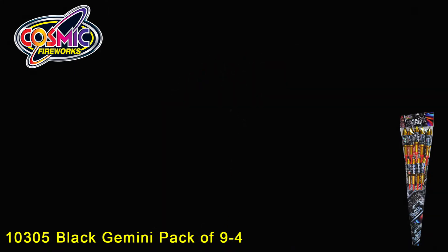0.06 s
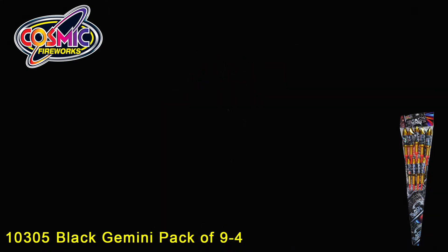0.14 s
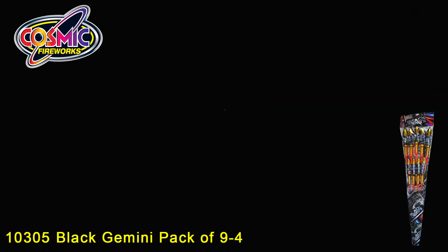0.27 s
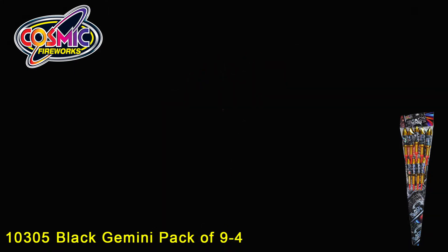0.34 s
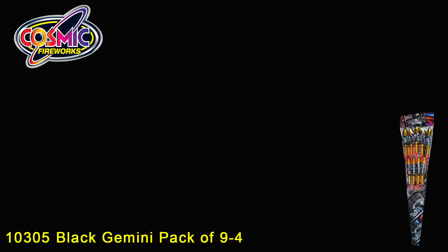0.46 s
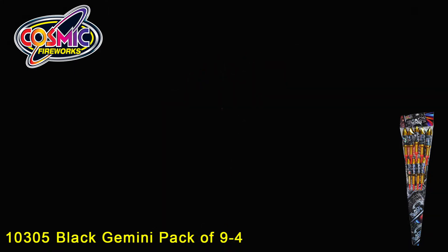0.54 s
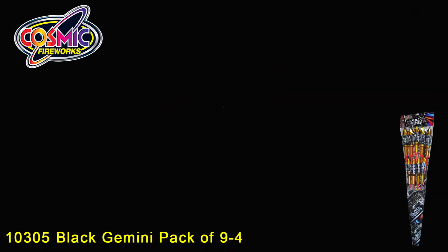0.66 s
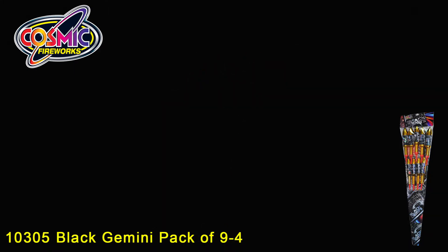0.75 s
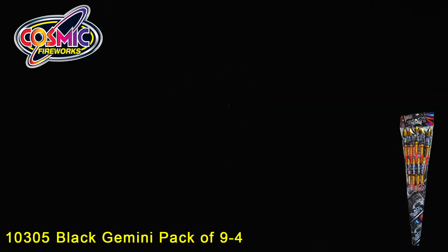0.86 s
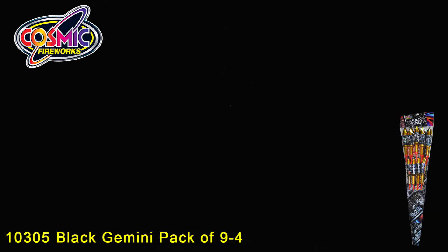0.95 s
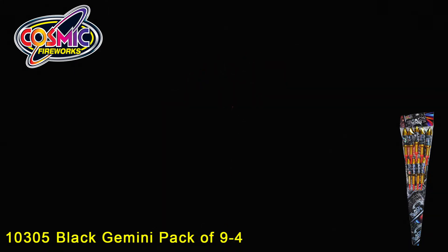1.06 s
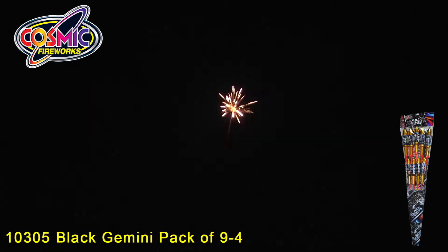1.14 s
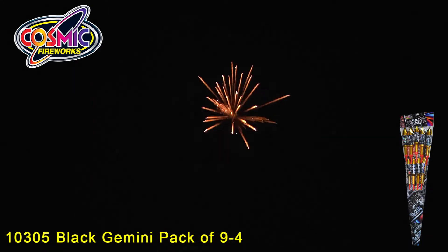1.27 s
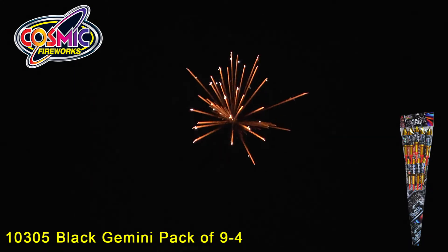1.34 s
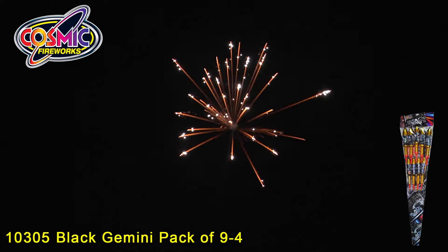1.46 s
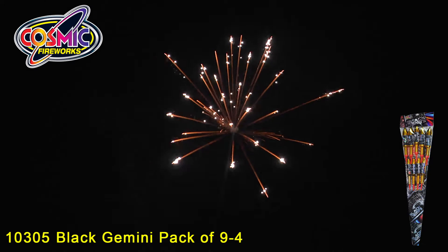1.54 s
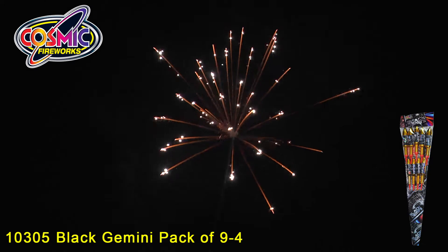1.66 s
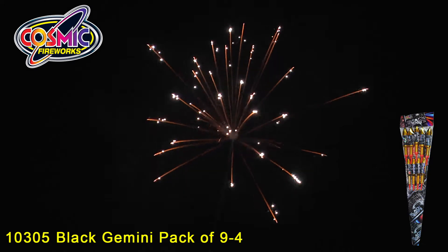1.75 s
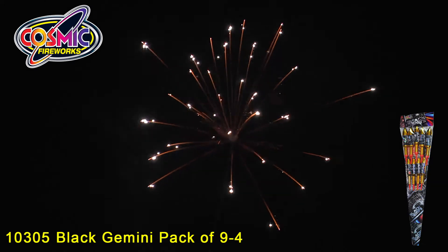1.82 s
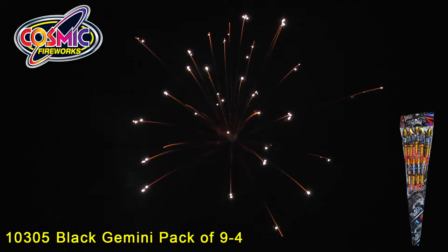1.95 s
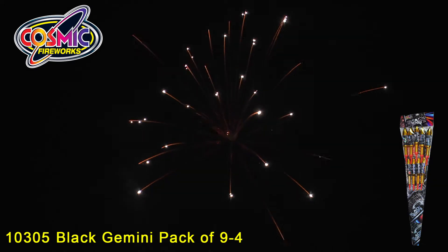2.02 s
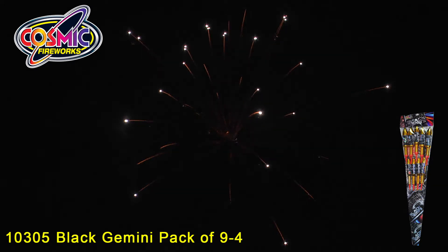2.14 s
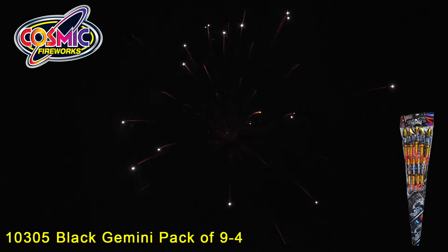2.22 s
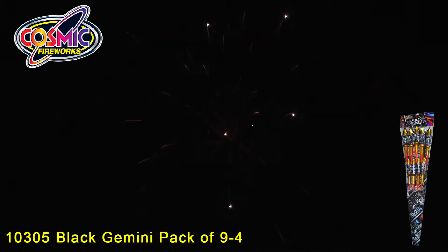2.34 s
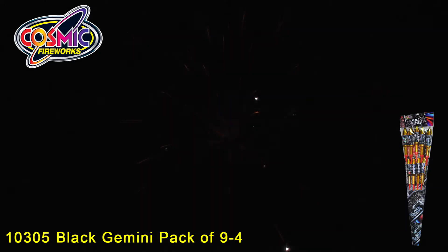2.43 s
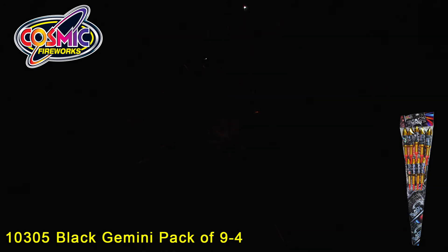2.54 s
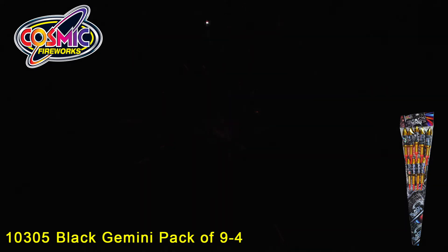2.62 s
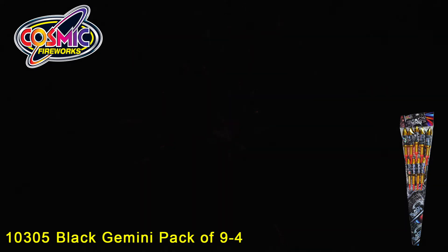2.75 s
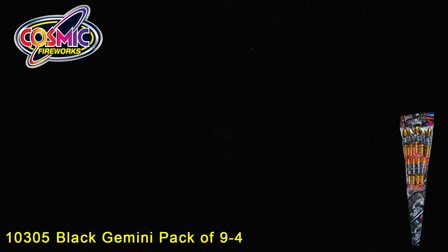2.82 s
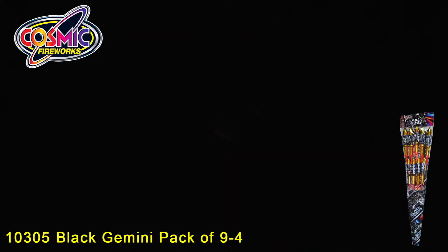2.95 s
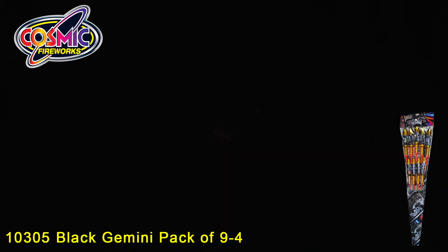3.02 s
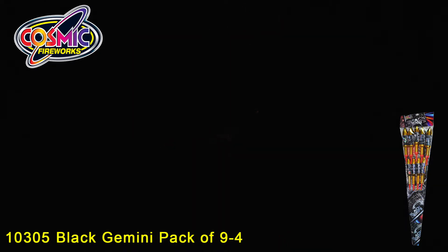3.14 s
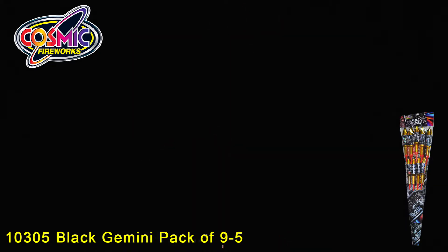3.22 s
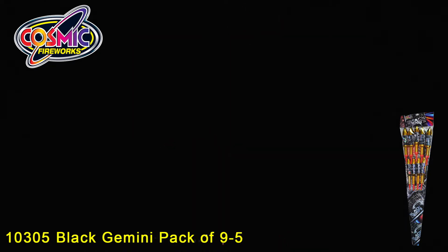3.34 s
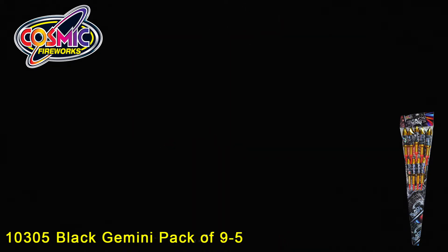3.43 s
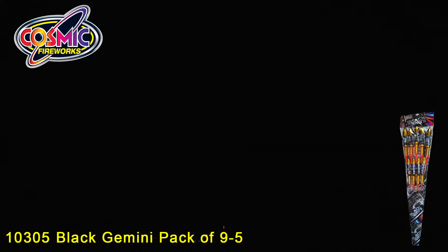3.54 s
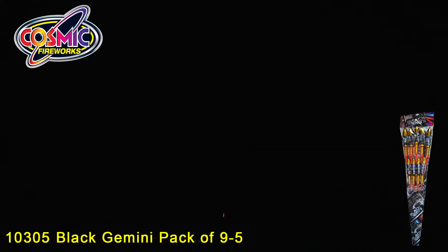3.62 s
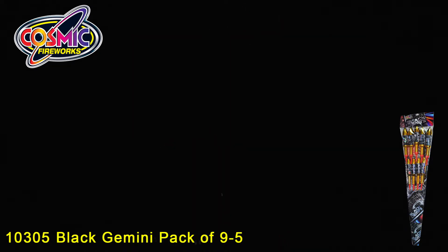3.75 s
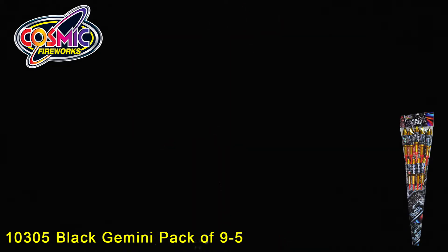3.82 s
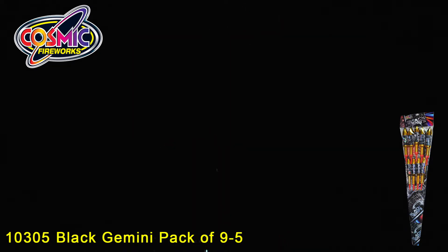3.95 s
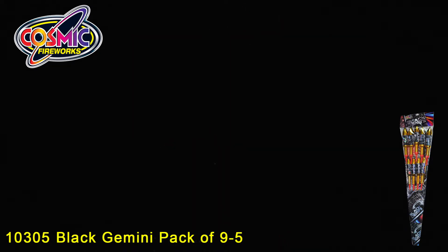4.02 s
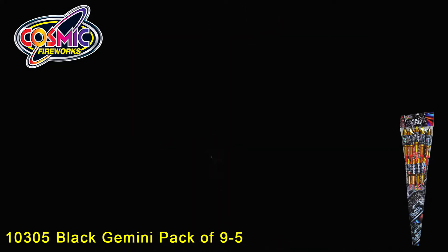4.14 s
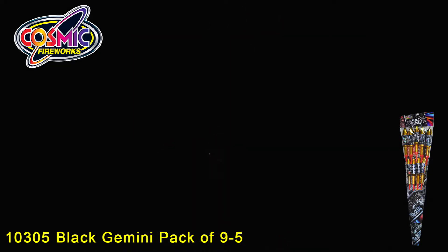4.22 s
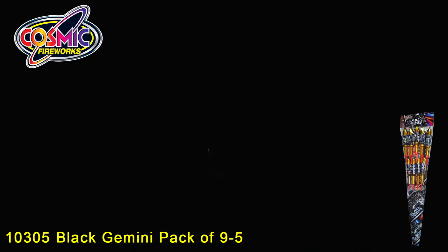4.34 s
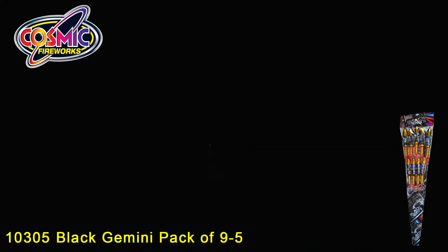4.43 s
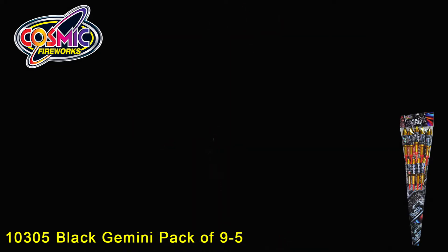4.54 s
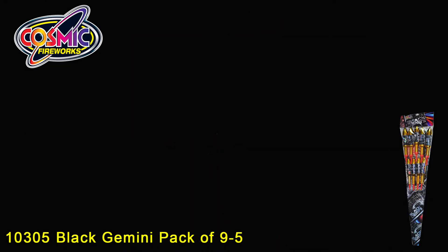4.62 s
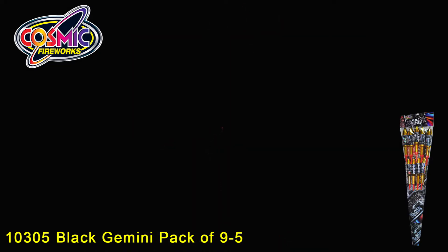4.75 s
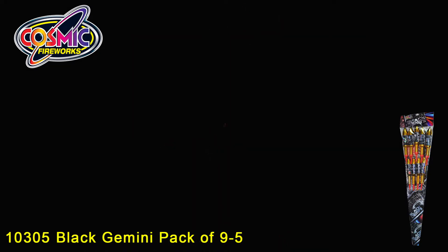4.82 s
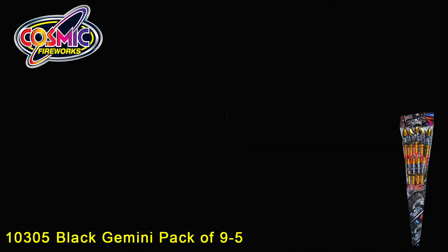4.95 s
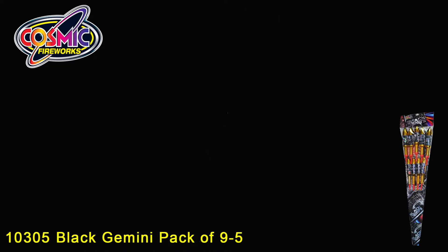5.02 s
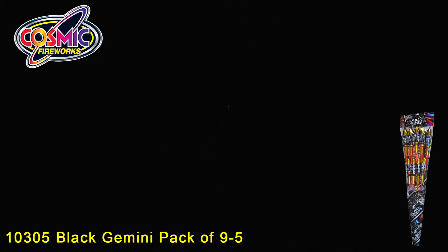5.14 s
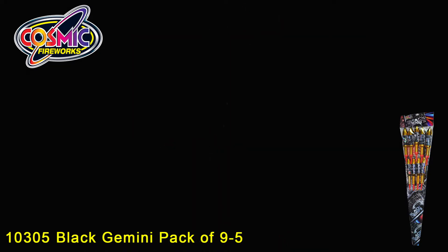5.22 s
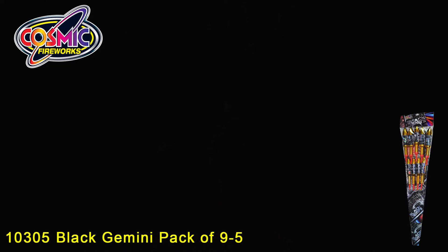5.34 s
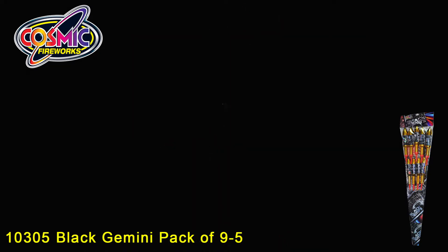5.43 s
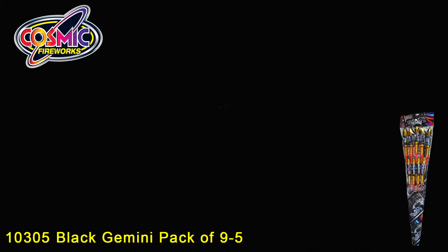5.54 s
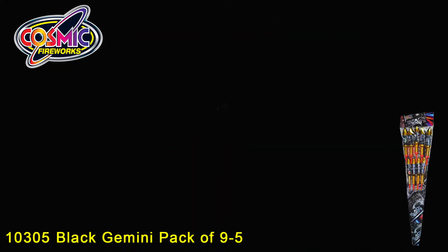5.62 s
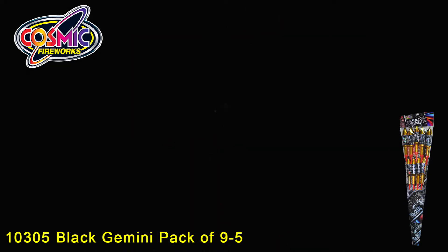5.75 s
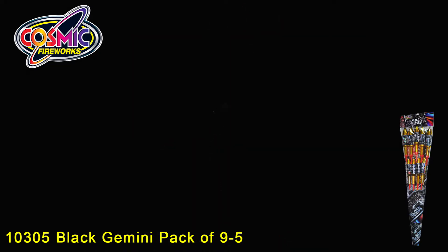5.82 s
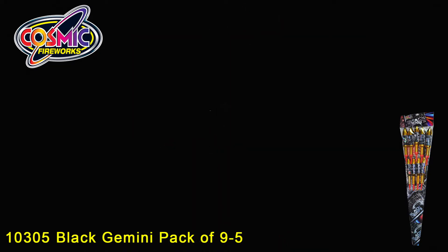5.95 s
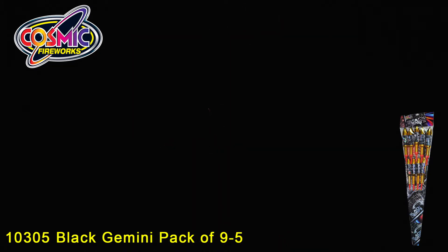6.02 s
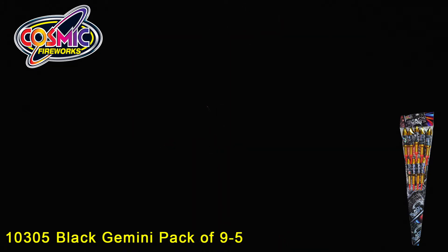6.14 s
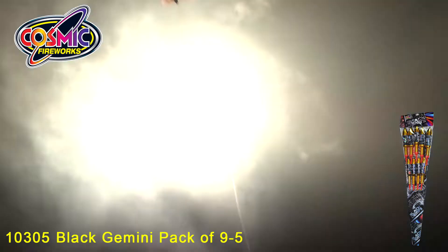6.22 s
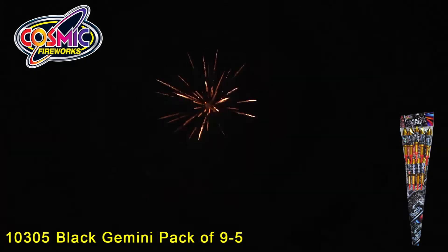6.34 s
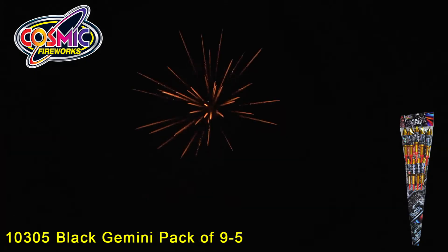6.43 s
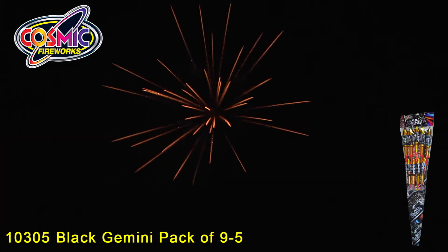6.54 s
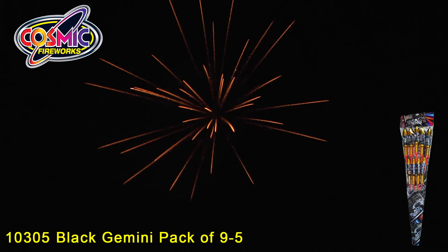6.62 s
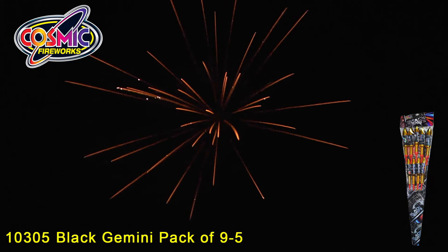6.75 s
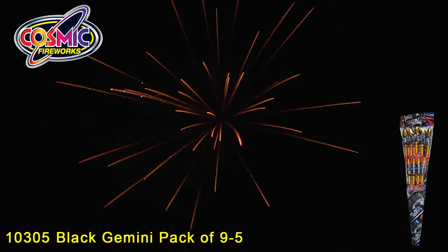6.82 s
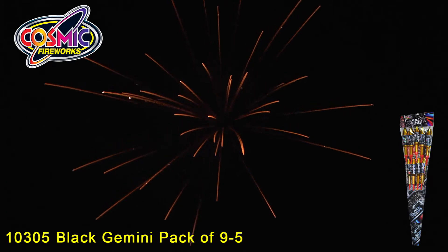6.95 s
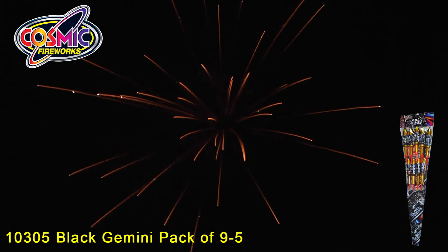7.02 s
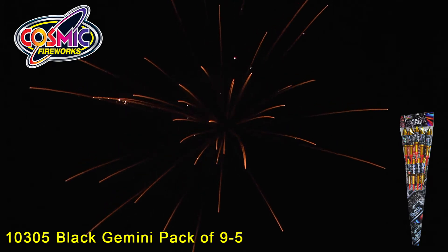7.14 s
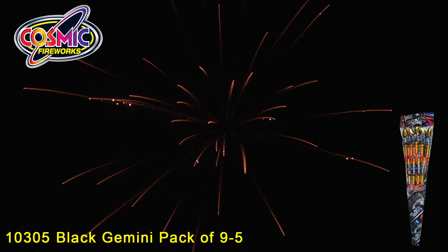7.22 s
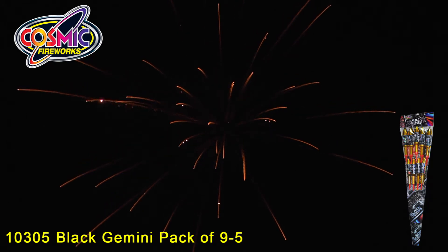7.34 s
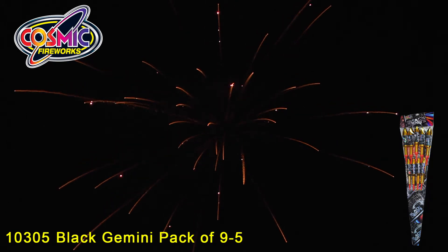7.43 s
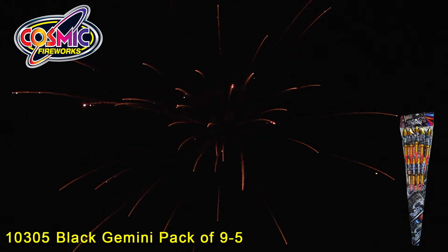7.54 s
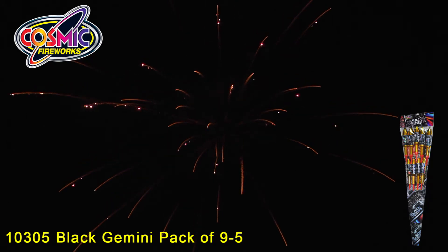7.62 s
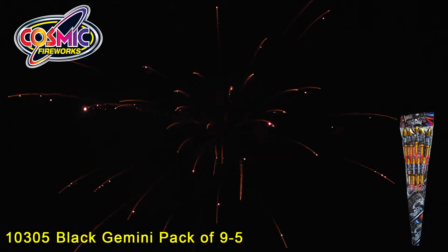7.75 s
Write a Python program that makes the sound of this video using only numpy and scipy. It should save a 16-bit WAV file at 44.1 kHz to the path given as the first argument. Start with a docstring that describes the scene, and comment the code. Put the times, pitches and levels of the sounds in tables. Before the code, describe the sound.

Stereo microphone in open land at night, close enough to fireworks to clip hard. First a quiet insect bed, then a violent bang, dull echoes and a fizzing storm of crackles. After a hard cut the insects are louder; a sputtering rocket rushes up and fades, a hollow clatter follows, then another crushing bang with clumpy low echoes while the insects seem ducked and slowly return.

```python
"""Fireworks at night

A rocket bursts overhead into crackling stars; after a cut to a later moment a second one hisses up and bursts.
Blasts are pressure steps that overload the microphone; echoes are clumped noise, dull tone swells and slaps.
Stars are random snaps, the motor is sputtering noise, knocks are ringing tube modes with a rattle.
Far traffic is low noise; insects are shaped noise, pulsed tones and the teeth of a buzzing wing.
"""
import sys
import numpy as np
from scipy import signal
from scipy.fft import rfft, irfft, next_fast_len
from scipy.io import wavfile
from scipy.ndimage import uniform_filter1d, map_coordinates

SR = 44100
rng = np.random.default_rng(int(sys.argv[2]) if len(sys.argv) > 2 else 0)


def elevation(decibels):
    """Turn decibel levels (scalar or array-like) into linear amplitude ratios."""
    levels = np.asarray(decibels, float)
    return 10 ** (levels / 20)


def bounce(signal):
    """Save signal as a 16-bit WAV file at the path given by the first command-line argument."""
    frames = np.transpose(np.atleast_2d(signal))
    limited = np.clip(frames, -1, 1)
    pcm = np.round(limited * 32767).astype(np.int16)
    wavfile.write(sys.argv[1], SR, pcm)


N = 342945
CHANGE_S = 3.228  # cut to a later moment

# Blasts. Each row: start in s, front dip in ms, overpressure in ms, suction and rebound amplitude (1 = full scale).
BURSTS = [(1.45631, .125, .315, 6.9, 2.2), (6.56756, .112, .225, 4.4, 1.6)]
# Motor hiss spectrum. Each row: frequency in Hz, relative level in dB per Hz.
JET_SPECTRUM = [(180, -37), (300, -20), (420, -10), (560, -0.5), (882, -1.5), (1060, -4), (1230, 1),
                (1500, -5), (1740, -0.5), (2720, 2.5), (3450, -1), (3800, -8), (4330, -10.5), (5650, -4),
                (10100, -22.5), (11500, -16.5), (12900, -24), (15800, -49)]
# Stereo likeness of crackle and rattle. Each row: frequency in Hz, left-right correlation (-1 to 1).
NEAR = [(60, 1), (240, .99), (950, 0.96), (2400, 0.92), (3300, 0.85), (4200, -0.4), (5200, 0.35),
        (6200, 0.8), (8000, 0), (10000, .1), (15000, -0.1)]
# Stereo likeness of sound from all round. Each row: frequency in Hz, left-right correlation (-1 to 1).
DIFFUSE = [(60, .99), (350, .98), (750, .95), (1500, .85), (2400, .65), (3200, .4), (4100, -.65),
           (5200, -.4), (6300, .7), (7200, -.1), (8200, -.45), (10000, -.6), (15000, -.65)]


def unit(x):
    """Scale to rms 1."""
    return x / np.sqrt(np.mean(x ** 2) + 1e-20)


def along(points, hz):
    """Interpolate (Hz, value) points on a log frequency axis."""
    f, v = np.transpose(points)
    return np.interp(np.log(hz + 1), np.log(f + 1), v)


def curves(rows):
    """One value per sample for each column after the time, and a gate open while the rows last."""
    s, *cols = np.transpose(rows)
    t = np.arange(N) / SR
    gate = (t >= s[0]) & (t < s[-1])
    return [np.interp(t, s, c) for c in cols] + [gate]


def wobble(rate):
    """Smooth random curve, rate knots per second."""
    knots = rng.standard_normal(int(N * rate / SR) + 4)
    return map_coordinates(knots, [np.arange(N) * rate / SR])


def coloured(x, spectrum):
    """Filter with a causal minimum-phase response of unit energy."""
    m = 2 ** 13
    gain = elevation(along(spectrum, np.fft.rfftfreq(m, 1 / SR)))
    cepstrum = irfft(np.log(gain + 1e-5))
    cepstrum[1:m // 2] *= 2
    cepstrum[m // 2 + 1:] = 0
    h = irfft(np.exp(rfft(cepstrum)))
    return signal.oaconvolve(x, (h / np.linalg.norm(h))[None], axes=1)[:, :N]


def spread(pair, alike):
    """Mix two unrelated signals to left and right with a given correlation per frequency."""
    m = next_fast_len(N)
    turn = np.arccos(np.clip(along(alike, np.fft.rfftfreq(m, 1 / SR)), -1, 1)) / 2
    mid, side = irfft(rfft(pair, m) * [np.cos(turn), np.sin(turn)], m)[:, :N]
    return np.array([mid + side, mid - side])


def noise(spectrum, alike):
    """Stereo Gaussian noise of rms 1 with a given spectrum and correlation."""
    return unit(spread(coloured(rng.standard_normal((2, N)), spectrum), alike))


def pan(db):
    """Left and right gains for a left-right difference in dB."""
    return elevation(np.array([db, np.negative(db)]) / 2)


def traffic_hum():
    """Far traffic: slowly wavering low noise, of another spectrum after the cut."""
    # Before and after the cut. Each row: frequency in Hz, relative level in dB per Hz.
    early_hum_spectrum = [(15, -42), (25, -19), (90, 3), (151, -0.5), (266, 0.5), (350, -5.5), (406, -2),
                          (619, -13), (2000, -20.5), (2600, -57), (4400, -120)]
    late_hum_spectrum = [(15, -42), (25, -9), (103, -2.5), (145, 3), (234, -8), (332, -4.5), (413, -16.5),
                         (564, -10.5), (2000, -27), (2600, -70), (4400, -120)]
    early = np.arange(N) / SR < CHANGE_S
    traffic = np.where(early, noise(early_hum_spectrum, DIFFUSE), noise(late_hum_spectrum, DIFFUSE))
    return elevation(np.where(early, -52, -52.5) + 1.5 * wobble(5)) * traffic


def insect_chorus():
    """Many singers merge into restless treble noise, of another spectrum after the cut."""
    # Before and after the cut. Each row: frequency in Hz, relative level in dB per Hz.
    early_song_spectrum = [(880, -9), (1500, -19.5), (2410, -2), (2530, -2), (3050, -3), (3470, -7.5),
                           (4750, -6.5), (6640, 3), (7470, -10), (9750, -10.5), (12000, -19.5),
                           (13900, -17), (15800, -34)]
    late_song_spectrum = [(880, -24.5), (1500, -24), (2020, -19.5), (2410, -9), (3530, -16.5),
                          (4140, -18.5), (4800, -6), (5400, -9.5), (5960, -2.5), (7850, -13.5),
                          (8660, -11.5), (9750, -21.5), (11500, -21.5), (12800, -24), (15800, -39)]
    # Stereo likeness after the cut. Each row: frequency in Hz, left-right correlation (-1 to 1).
    wide_likeness = [(1500, .85), (2400, 0.55), (3200, 0.4), (4200, -0.7), (5200, -0.7), (6200, 0.4),
                     (6800, 0.3), (7500, -0.4), (10000, -0.85), (15000, -0.3)]
    start_dip_db, start_dip_s = 0.5, 0.56  # very slightly quieter just after the cut; time constant
    t = np.arange(N) / SR
    early = t < CHANGE_S
    song = np.where(early, pan([2]) * noise(early_song_spectrum, DIFFUSE),
                    noise(late_song_spectrum, wide_likeness))
    start_dip = start_dip_db * (t >= CHANGE_S) * np.exp(-np.abs(t - CHANGE_S) / start_dip_s)
    level_db = np.where(early, -51.5, -46.5) - start_dip
    return elevation(level_db) * pan([-4]) * unit(elevation(1.26 * wobble(60)) * song)


def katydid():
    """Wing teeth strike at a steady rate and ring a high band, in short bursts."""
    # Each row: start in s, level in dB, length in s.
    buzzes = [(4.29, -54, 0.056), (4.95, -58, 0.078), (5.622, -59, 0.078), (6.336, -57, 0.089),
              (7.17, -73, 0.07)]
    t = np.arange(N) / SR
    bursts = sum(elevation(db) * np.exp(-((t - s - length / 2) / length * 2) ** 4) for s, db, length in buzzes)
    teeth = np.zeros((1, N))
    teeth[0, ::round(SR / 410)] = 1
    buzz = unit(coloured(teeth, [(9500, -60), (11000, -3), (11800, 0), (13300, -3), (14200, -60)]))
    left, right = bursts * buzz * pan([-3])
    return np.array([np.roll(left, 1), right])  # sound from the right reaches the left capsule later


def cricket():
    """A trill after the cut: short raspy pulses of tone with a weaker upper band."""
    start_per_s, pulses_per_s, settle_s = 119, 72, .4  # faster at first
    level_db, extra_db, calm_s = -58.5, 13, 1.3  # louder at first
    chirp_s, chirp_start_s, gap_db = .076, 3.25, 7  # the early trill dips briefly once a chirp
    limp, pulse_floor = .4, .5  # pulses alternate stronger and weaker; sound left between them
    age = np.arange(N) / SR - CHANGE_S
    early = np.exp(-(age / settle_s) ** 4)
    rate = pulses_per_s - (pulses_per_s - start_per_s) * early
    phase = 2 * np.pi * np.cumsum(rate) / SR + 1.1 * wobble(7.5)
    beat = np.clip(np.sin(phase), 0, 1) ** 2 * (1 + limp * np.sin(phase / 2)) + pulse_floor
    main_hz = 6130 + 420 * np.tanh(wobble(650))
    upper_hz = 8600 + 300 * wobble(600)
    tone = np.sin(2 * np.pi * np.cumsum(main_hz) / SR)
    tone = tone + elevation(-15.5) * np.sin(2 * np.pi * np.cumsum(upper_hz) / SR)
    gap = np.cos(np.pi * (age + CHANGE_S - chirp_start_s) / chirp_s) ** 8 * early
    trill_db = level_db + extra_db * np.exp(-(age / calm_s) ** 4) + 2.8 * wobble(13) - gap_db * gap
    return (age > 0) * elevation(trill_db) * unit(beat * tone) * pan([-4])


def peeper():
    """A lower insect after the cut: short, soft, uneven peeps of wavering tone."""
    t = np.arange(N) / SR
    beat = np.clip(np.sin(2 * np.pi * 14 * t + 1.2 * wobble(6)), 0, 1) ** 6  # 14 peeps per s
    tone = np.sin(2 * np.pi * np.cumsum(2440 + 90 * wobble(150)) / SR)
    return (t > CHANGE_S) * elevation(-67 + 2.7 * wobble(10)) * unit(beat * tone) * pan([-6])


def night():
    """Traffic and insects; chorus, cricket and peeper are turned down after the second burst, then recover."""
    dip_db, recover_s = 43, 0.67
    since = np.arange(N) / SR - BURSTS[-1][0]
    dip = elevation(-dip_db * (since > 0) * np.exp(-np.abs(since) / recover_s))
    return traffic_hum() + dip * (insect_chorus() + cricket() + peeper()) + katydid()


def knocks():
    """A hollow tube rings briefly in damped modes, with a rattle at the contact."""
    # Each row: start in s, level in dB, sharpness in dB per octave (tilt of the modes about 200 Hz).
    blows = [(4.637, -29, -9), (4.661, -26, -9), (4.738, -4, 2), (4.7429, -15, 0), (4.748, -13, 0.5),
             (4.7528, -11, -1), (4.7555, -5.5, -7.5)]
    # Each row: mode frequency in Hz, level in dB, t60 in s.
    tube_modes = [(148.5, -4, 0.19), (223, 0, 0.056), (377, -7.5, 0.05), (490, -4, 0.0073),
                  (603, -10.5, 0.084), (629, -16, 0.19), (716, 10, 0.016), (1073, 3, 0.014),
                  (1430, -9, .015), (1650, -10.5, 0.021), (2060, 5, 0.011), (2570, -11, 0.007),
                  (2906, 8, 0.014), (3900, -3, .01), (4370, -2, 0.0088), (4850, -6, .008),
                  (5400, -9, 0.0068), (6170, -10, 0.014)]
    contact_s, uneven_db = .0016, 1  # rise of a knock; scatter of the modes from blow to blow
    out, t = np.zeros((2, N + SR)), np.arange(SR // 4) / SR
    rise = 1 - np.exp(-(t / contact_s) ** 2)
    for s, db, sharp_db in blows:
        ring = np.zeros(len(t))
        for k, (hz, mode_db, t60) in enumerate(tube_modes):
            start_db = mode_db + rng.normal(0, uneven_db) + sharp_db * np.log2(hz / 200)
            ring += (-1) ** k * elevation(start_db - 60 * t / t60) * np.sin(2 * np.pi * hz * t)
        rattle = elevation(2.5 * sharp_db - 5.5 - 60 * t / 0.02) * noise(JET_SPECTRUM, NEAR)[:, :len(t)]
        out[:, round(s * SR):][:, :len(t)] += elevation(db - 13.0) * (ring + rattle) * rise
    return out[:, :N]


def rocket():
    """A sputtering jet of burning gas: hiss over a low roar; swells, falls away, then a short noise burst."""
    # Each row: time in s, level in dB; the late peak is a short noise burst with the knock.
    thrust = [(3.42, -52), (3.472, -46.5), (3.53, -33.5), (3.538, -37), (3.712, -27), (3.96, -24),
              (4.02, -33), (4.372, -49), (4.71, -54), (4.726, -59), (4.738, -21.5), (4.742, -23.5),
              (4.772, -54.5), (4.9, -57.5)]
    # Spits of the motor. Each row: start in s, gain over the jet in dB.
    spits = [(3.495, -1), (3.527, 6), (3.56, -1), (3.601, 3.5), (3.638, 3.5), (3.719, 2.5), (3.869, 6),
             (3.93, 2)]
    # Each row: frequency in Hz, relative level in dB per Hz.
    roar_spectrum = [(24, -70), (40, -18), (95, -2), (135, 8.5), (185, 8), (260, -2), (380, -19), (500, -9),
                     (650, -21), (1100, -120)]
    # Each row: frequency in Hz, left-right correlation (-1 to 1).
    ahead_likeness = [(60, 1), (950, .98), (2400, .94), (3400, .9), (4100, .1), (4900, .8), (6400, .82),
                      (8000, .3), (10000, -.25), (15000, -.15)]
    spit_decay_s = 0.0074
    roar_db, roar_follows = -14.5, 0.77  # over the hiss at its loudest; share of the level's dB followed
    level_db, gate = curves(thrust)
    t = np.arange(N) / SR
    level_db = level_db + sum(db * (t > s) * np.exp(-np.abs(t - s) / spit_decay_s) for s, db in spits)
    before_peak = t < t[level_db.argmax()]  # until the loudest moment the roar follows the level only partly
    sputter = elevation(0.72 * wobble(35) + 1.0 * wobble(300))
    hiss = unit(sputter * noise(JET_SPECTRUM, ahead_likeness))
    below_peak_db = np.maximum(level_db - level_db.max(), -16)
    roar_gain = elevation(roar_db + (roar_follows - 1) * before_peak * below_peak_db + 1.2 * wobble(15))
    jet = hiss + roar_gain * noise(roar_spectrum, ahead_likeness)
    return gate * elevation(level_db) * pan([-0.2]) * jet


def dense_stars():
    """Many small stars snap at random times; they light up together and burn out one by one."""
    # Each row: time in s, level in dB.
    star_levels = [(1.66, -51.5), (1.74, -34.5), (1.8, -28.5), (1.88, -23), (2.05, -21), (2.224, -20),
                   (2.4, -21.5), (2.574, -23.5), (2.66, -26.5), (2.71, -32), (2.78, -39), (2.86, -48),
                   (2.95, -52)]
    peak_per_ms, thinning = 2.2, 0.66  # snaps at full level; share of the level's dB by which the count falls
    upright = .6  # share of snaps that arrive as a push
    level_db, gate = curves(star_levels)
    dying = np.where(np.arange(N) > level_db.argmax(), 1, .3)
    per_ms = peak_per_ms * elevation(thinning * dying * (level_db - level_db.max()))
    chance, size, place = rng.random(N), rng.exponential(size=N), rng.standard_normal(N)
    fired = chance < np.clip(per_ms, .05, 20) * 1000 / SR
    sign = np.where(rng.random(N) < upright, 1, -1)
    dense = fired * sign * elevation(0.49 * np.minimum(size, 4.5)) * np.array([np.ones(N), place])
    dense /= np.sqrt(uniform_filter1d(dense[0] ** 2, size=SR // 8).clip(1e-9))  # even level, despite the count
    return spread(dense * gate * elevation(level_db), NEAR)


def loud_stars():
    """Single bigger stars: a push, a pull and a shattering burst, answered once off the ground."""
    # Each row: time in s, strength in dB.
    pops = [(2.5112, -4), (2.5424, 0), (2.5594, -4), (2.5815, -2), (2.6055, -5), (2.656, -6), (2.6755, -5),
            (2.6883, -5), (2.6918, -3), (2.7, -7), (2.7149, -7), (2.7272, -9.5), (2.731, -8), (2.7417, -8),
            (2.7475, -10), (2.7515, -9), (2.762, -9), (2.769, -10), (2.7758, -7), (2.8051, -5),
            (2.8098, -11), (2.8136, -3), (2.8185, -12), (2.8281, -9), (2.833, -15), (2.8445, -15),
            (2.8574, -15), (2.9057, -7), (2.9265, -13), (2.9437, -6), (2.9486, -7), (2.992, -17),
            (3.017, -18), (3.0245, -11), (3.0294, -12), (3.109, -17), (3.1972, -16)]
    push_ms, shatter_t60_s = .2, .008  # push-to-pull time
    ground_ms, ground_db = 2.1, -9
    late, fade = np.zeros((2, N)), elevation(-60 * np.arange(SR // 100) / SR / shatter_t60_s)
    for s, db in pops:
        burst = rng.standard_normal(len(fade)) * fade
        burst[[0, round(push_ms * SR / 1000)]] = 9, -7.5
        place = np.array([[1], [rng.choice([-1, 1])]])
        late[:, round(s * SR):][:, :len(fade)] += elevation(db) * place * burst / np.linalg.norm(burst)
    late = late + elevation(ground_db) * np.roll(late, shift=round(ground_ms * SR / 1000), axis=1)
    body = [(300, 6.5), (2500, 1.0), (5000, 8.0), (9000, 2), (15000, -4)]  # Hz, dB per Hz
    return coloured(spread(late, NEAR), body)


def crackle():
    """Each star snaps once; the land smears the snaps into a decaying wash."""
    # Each row: frequency in Hz, relative level in dB per Hz.
    snap_spectrum = [(120, -29.5), (200, -4.5), (294, -4.5), (334, -2.5), (610, -6), (863, -1.5),
                     (1080, -7), (1700, -3), (3160, -0.5), (3480, -8.5), (3750, -9.5), (4160, -12),
                     (5280, -6.5), (8330, -17.5), (9300, -13.5), (10400, -23.5), (11400, -23.5),
                     (14200, -36), (15800, -55)]
    snaps, late = dense_stars(), loud_stars()
    t = np.arange(SR // 2) / SR
    smear = rng.standard_normal((2, len(t))) * elevation(-60 * t / 0.75) * (1 - np.exp(-t / 0.0011))
    smear /= np.linalg.norm(smear[0])
    wash = spread(signal.oaconvolve(snaps[:1] + 0.83 * late[:1], smear, axes=1)[:, :N], NEAR)
    return coloured(snaps + late + elevation(-7) * wash, snap_spectrum)


def booms():
    """Far slopes return the blast as soft swells of low tone."""
    # Each row: centre in s, level in dB, pitch in Hz, length in s (centre to 1/e).
    swells = [(1.66, -12.5, 316.6, 0.0075), (1.715, -18.5, 209, 0.016), (1.743, -19, 210, .012),
              (1.77, -21, 228.7, 0.008), (6.594, -11.5, 166, .008), (6.624, -11.5, 281, 0.013),
              (6.659, -13.5, 241.5, 0.0078), (6.786, -15, 250, 0.013), (6.767, -15, 299.5, 0.013),
              (6.806, -18, 230, 0.0099), (6.899, -18, 286, 0.0087), (6.928, -21.5, 201, 0.01),
              (6.963, -17.5, 350, 0.006), (7.175, -24, 311, 0.014), (7.22, -21, 149.2, 0.0095),
              (7.263, -25, 148, 0.0098), (7.309, -27, 201.5, 0.01), (7.392, -28.5, 255, .012),
              (7.442, -37, 120, 0.01), (7.469, -25.5, 280, .008), (7.657, -30.5, 90, 0.013),
              (7.683, -37, 202.3, 0.014), (7.7, -30, 300, .012), (7.755, -34, 130.6, 0.017)]
    t = np.arange(N) / SR
    out = np.zeros((2, N))
    for s, db, hz, length in swells:
        tone = np.sin(2 * np.pi * (hz * t + rng.random()))
        out += elevation(db) * np.exp(-((t - s) / length) ** 2) * tone * pan([rng.normal(0, 1.5)])
    return out * (t > BURSTS[0][0])


def slaps():
    """Near surfaces answer the blast singly, with a front rounded by the air."""
    # Each row: start in s, level in dB, front width in ms, left-right difference in dB.
    single_echoes = [(1.4934, -3.5, 0.45, 3), (1.661, -11.5, 0.18, 15), (3.045, -23, 0.47, 2),
                     (3.111, -23.5, 0.68, 4.5), (6.605, -15, 0.51, -4), (6.6155, -11, 0.3, 3),
                     (6.6564, -22, 0.7, -6), (6.7436, -9, 0.59, 4), (6.783, -31, 0.36, 9)]
    out, t_ms = np.zeros((2, N + SR)), np.arange(SR // 40) / SR * 1000
    for s, db, width_ms, side_db in single_echoes:
        u = t_ms / width_ms
        shape = (1 - u) * np.exp(-u) * (1 - np.exp(-(u / 0.34) ** 2))
        out[:, round(s * SR):][:, :len(u)] += elevation(db) * pan([side_db]) * shape / shape.max()
    return out[:, :N]


def echoes():
    """Countless dull copies of the blast: noise in uneven clumps under a smoother wash."""
    # Each row: first return in s, rumble in dB, rumble fade in dB/s, wash in dB, wash fade in dB/s, pitch factor.
    tails = [(1.481, -21, 15, -25.5, 11, 1.03), (6.588, -22.5, 12.5, -27.5, 8, 1.013)]
    # Returns from tree lines and slopes. Each row: start in s, hold in s, release in s, gain over the tail in dB.
    clumps = [(1.487, 0.013, .005, 9), (1.538, 0.07, 0.013, 6.5), (1.619, 0.04, 0.0036, 8),
              (1.70, 0.053, .012, 1.5), (1.77, .012, .008, -2), (1.822, 0.04, 0.0073, 2),
              (2.792, 0.018, 0.018, -1), (2.978, 0.016, 0.013, 5.5), (6.601, 0.06, 0.014, 5),
              (6.695, 0.031, 0.0098, 4.5), (6.737, 0.09, 0.042, 4.5), (6.851, 0.036, 0.0088, 3.5),
              (6.885, 0.018, .006, 4), (6.92, 0.045, 0.011, 2), (6.986, 0.026, 0.025, 4),
              (7.382, 0.046, 0.025, 1.5), (7.453, 0.06, .02, -2), (7.637, 0.084, 0.051, 2.5)]
    # Rumble, its slowest part, and wash. Each row: frequency in Hz, relative level in dB per Hz.
    rumble_spectrum = [(24, -55), (40, -18), (113, -4), (161, -2), (217, -1.5), (255, -2), (343, -0.5),
                       (442, -7.5), (550, -23), (720, -53), (1210, -120)]
    deep_spectrum = [(20, -19), (35, -6.5), (70, 0.5), (120, -1), (200, -29), (400, -120)]
    wash_spectrum = [(290, -25), (500, -3.5), (593, -1.5), (766, -4), (1700, -14.5), (2840, -16),
                     (3500, -20.5), (4290, -24), (5300, -25.5), (6300, -23.5), (7470, -32.5), (8860, -31),
                     (10200, -42), (11500, -39.5), (15000, -52)]
    return_s, clump_edge_s = 0.0022, 0.0029  # rise of the first return; edge of a clump
    clump_share = 0.66  # of the clump dB, in the wash
    deep_db, deep_fade_db_per_s = -39.5, 6.6
    t = np.arange(N) / SR
    wash = unit(elevation(0.85 * wobble(60)) * noise(wash_spectrum, DIFFUSE))
    clump_db = np.zeros(N)
    for s, hold, release, db in clumps:
        edge = .5 + .5 * np.tanh((t - s) / clump_edge_s)
        clump_db += db * edge * np.exp(-np.maximum(t - s - hold, 0) / release)
    out = np.zeros((2, N))
    for s, rumble_db, rumble_fade, wash_db, wash_fade, pitch in tails:
        shifted = [(hz * pitch, db) for hz, db in rumble_spectrum]
        roll = unit(elevation(0.45 * wobble(40) - 0.1 * wobble(19)) * noise(shifted, DIFFUSE))
        age = np.maximum(t - s, 0)
        same_side = (t < CHANGE_S) == (s < CHANGE_S)  # no tail crosses the cut
        gate = (1 - np.exp(-(age / return_s) ** 2)) * same_side
        deep = elevation(deep_db - deep_fade_db_per_s * age + 1.5 * wobble(7)) * noise(deep_spectrum, DIFFUSE)
        rumble = elevation(rumble_db - rumble_fade * age + clump_db) * roll
        smooth = elevation(wash_db - wash_fade * age + clump_share * clump_db) * wash
        out += gate * (deep + rumble + smooth)
    return out + slaps()


def blasts():
    """A shock front, a short overpressure, then long suction from which the capsule swings slowly back."""
    suction_s, rebound_s = .03, .08  # time constants
    left_extra_ms = np.array([[.023], [0]])  # the left capsule lets go later
    out = np.zeros((2, N))
    for s, dip_ms, over_ms, suction, rebound in BURSTS:
        t = np.arange(N) / SR - s
        after = np.maximum(t, 0)
        swing = rebound * np.exp(-after / rebound_s) - suction * np.exp(-after / suction_s)
        over = (t > dip_ms / 1000) & (t <= (dip_ms + over_ms + left_extra_ms) / 1000)
        out += np.where(over, 4, swing) * (t >= 0)
    return out


def scene():
    """Everything that reaches the microphone."""
    return night() + knocks() + rocket() + crackle() + booms() + echoes() + blasts()


def band_limit(x):
    """A steep low-pass at the top of the band."""
    return signal.sosfilt(signal.butter(12, 15850, fs=SR, output="sos"), x)


def record(dry):
    """The input stage clips hard, and the coupling capacitor after it lets a held level sag."""
    coupling_s = .27
    keep = np.exp(-1 / (coupling_s * SR))
    clipped = np.clip(dry * pan([-.5]), -.975, .975)
    held = signal.lfilter([1, -1], [1, -keep], clipped, axis=1)
    rounded = signal.lfilter(*signal.butter(1, 14000, fs=SR), held, axis=1)  # the converter rounds the edges
    return band_limit(rounded)


dry = scene()
out = record(dry)
bounce(out)
```